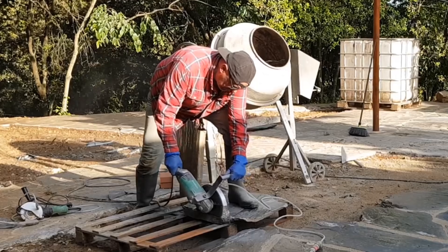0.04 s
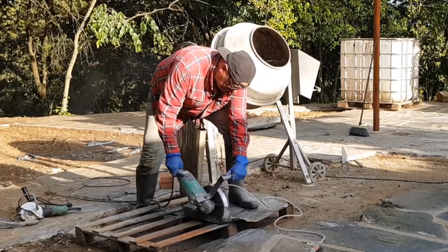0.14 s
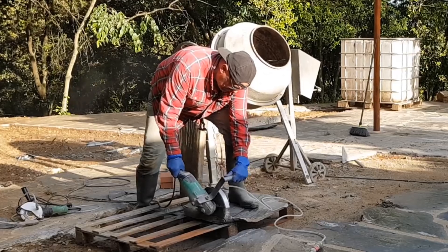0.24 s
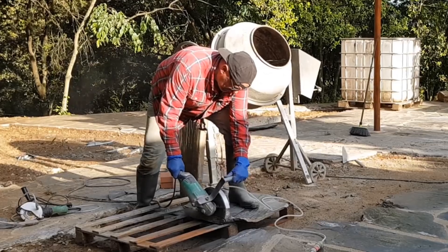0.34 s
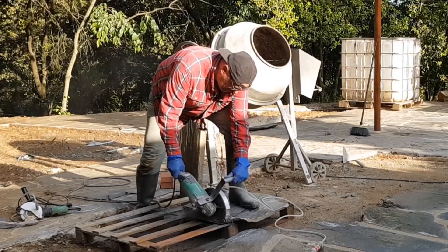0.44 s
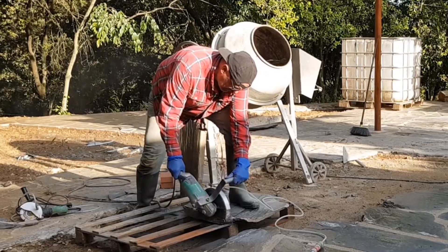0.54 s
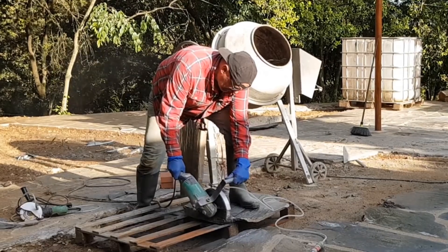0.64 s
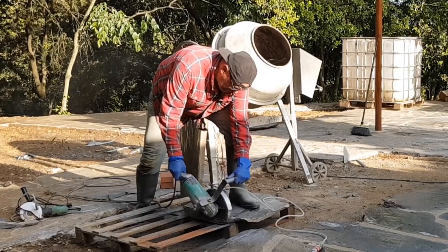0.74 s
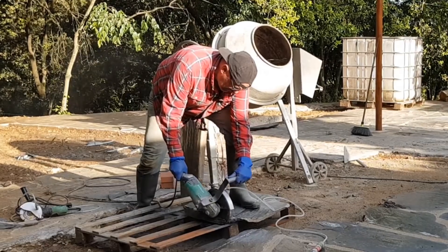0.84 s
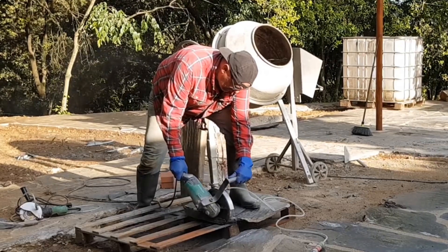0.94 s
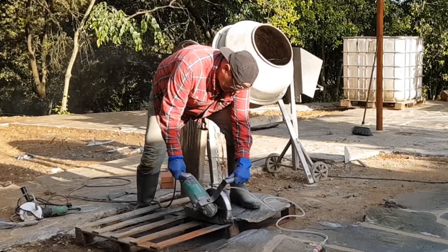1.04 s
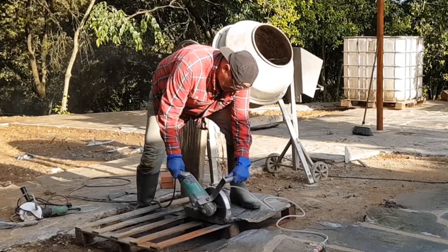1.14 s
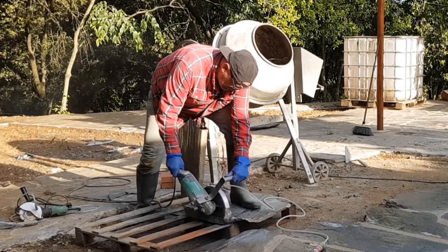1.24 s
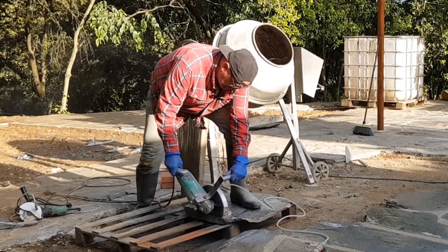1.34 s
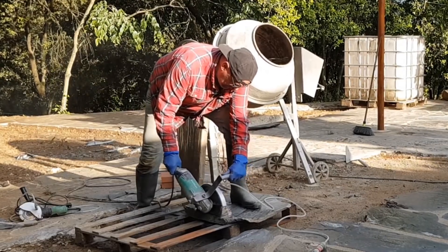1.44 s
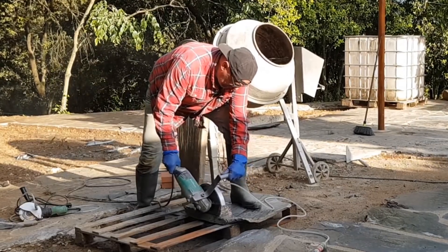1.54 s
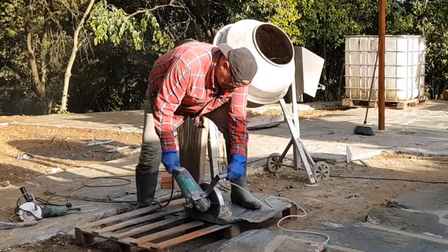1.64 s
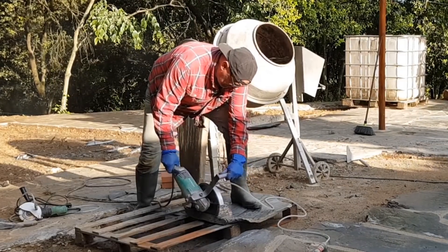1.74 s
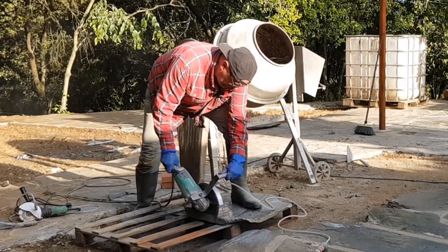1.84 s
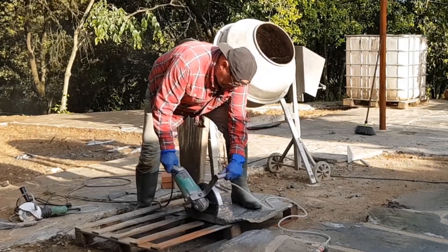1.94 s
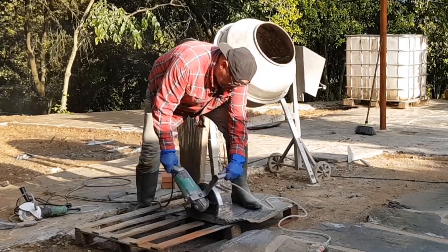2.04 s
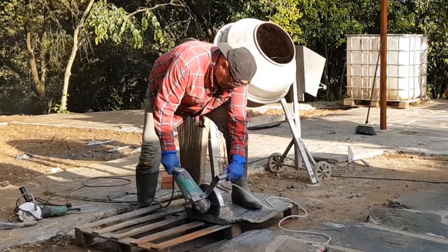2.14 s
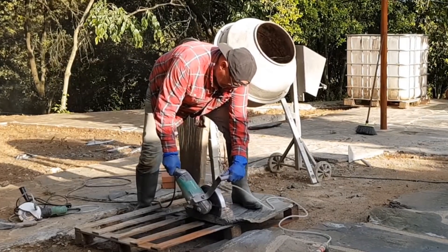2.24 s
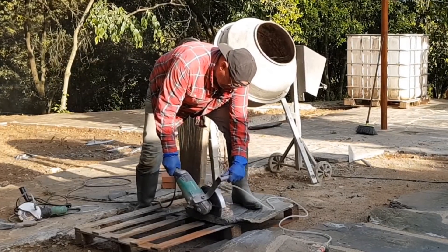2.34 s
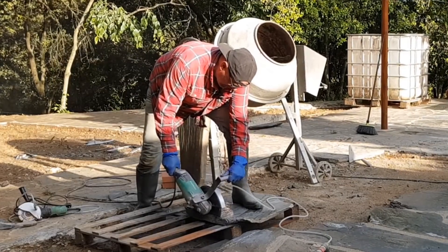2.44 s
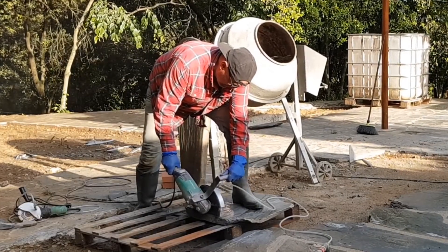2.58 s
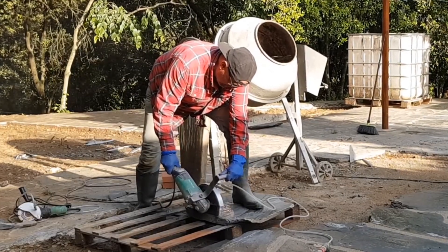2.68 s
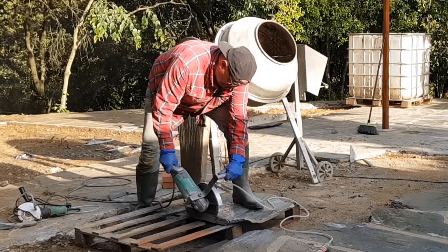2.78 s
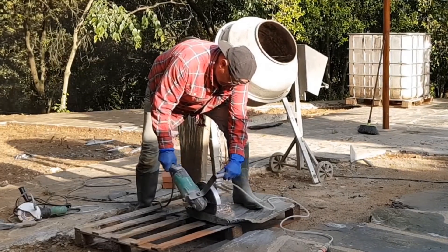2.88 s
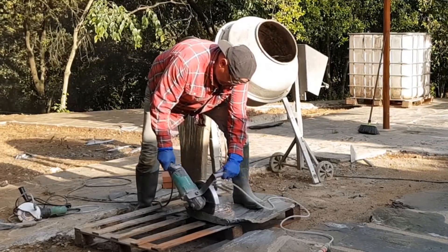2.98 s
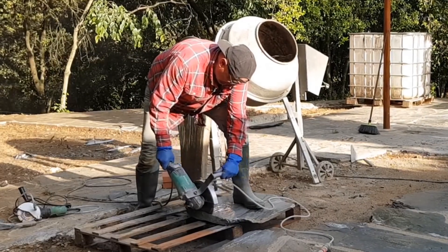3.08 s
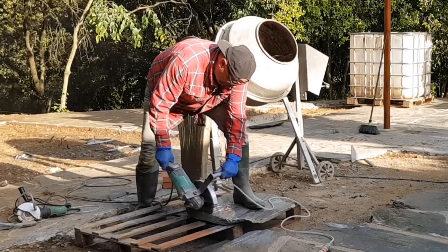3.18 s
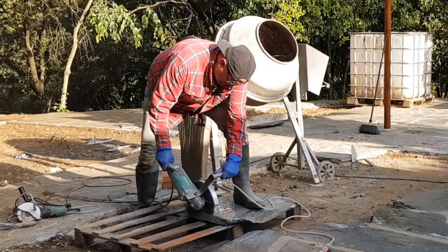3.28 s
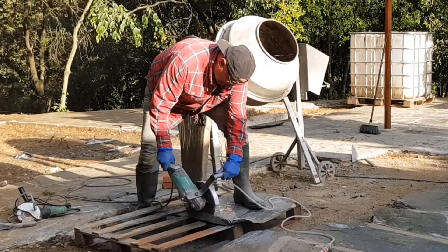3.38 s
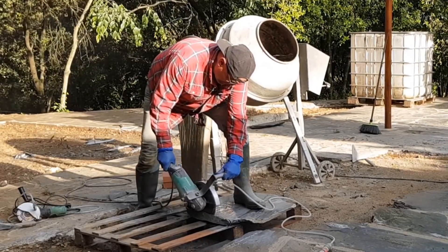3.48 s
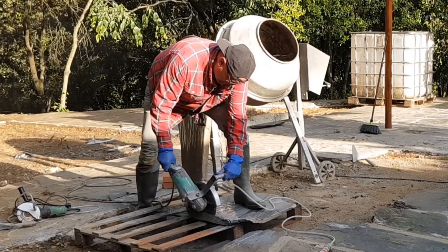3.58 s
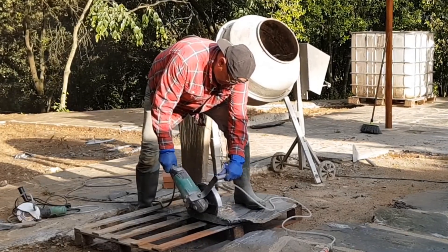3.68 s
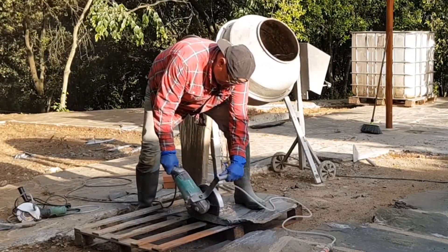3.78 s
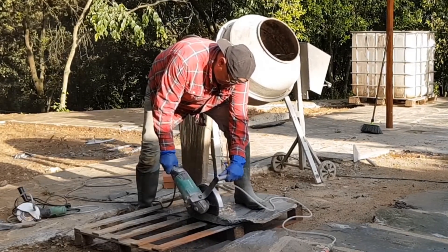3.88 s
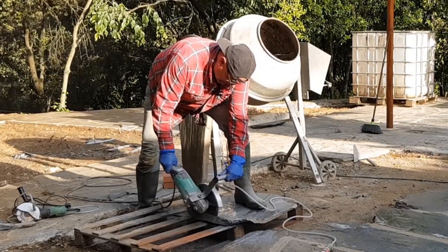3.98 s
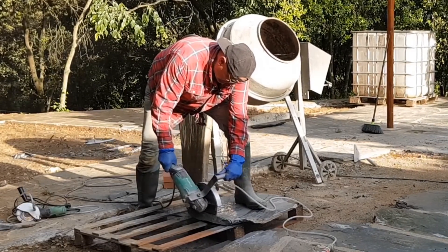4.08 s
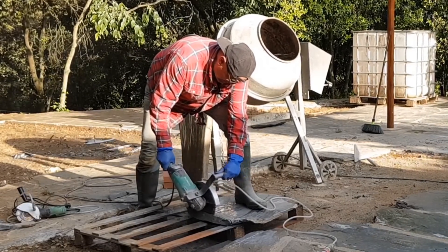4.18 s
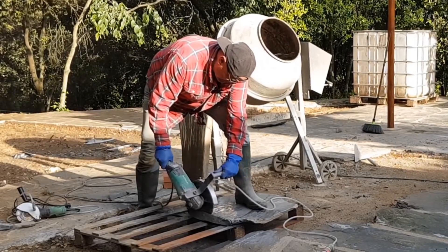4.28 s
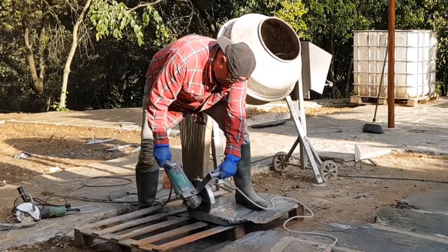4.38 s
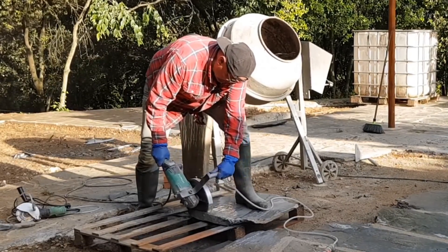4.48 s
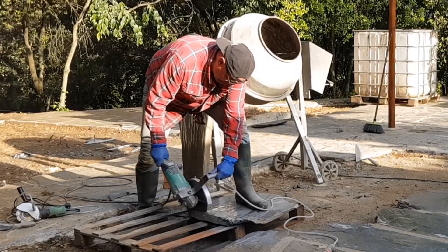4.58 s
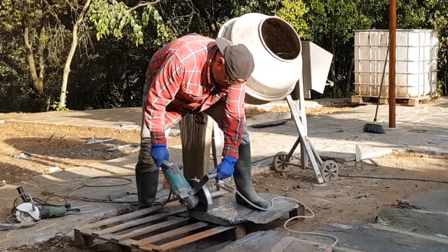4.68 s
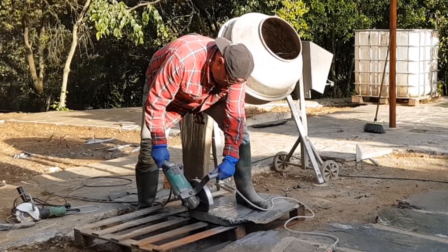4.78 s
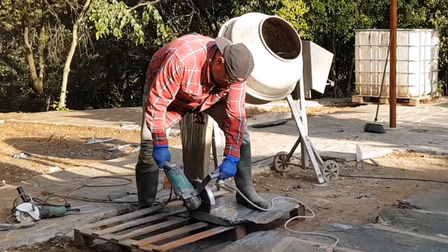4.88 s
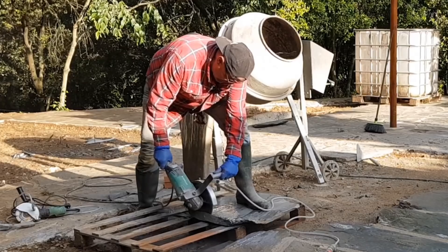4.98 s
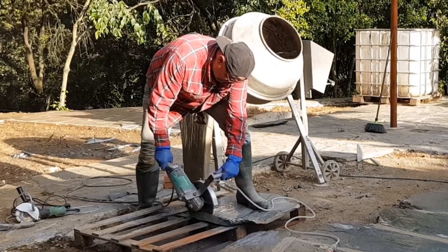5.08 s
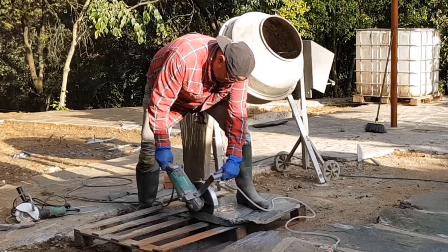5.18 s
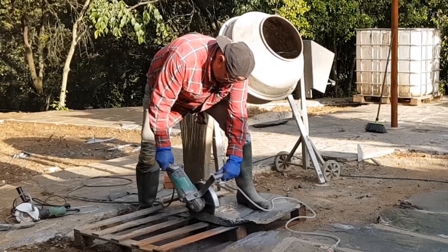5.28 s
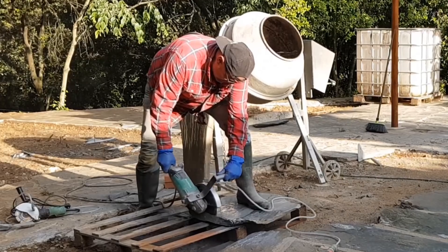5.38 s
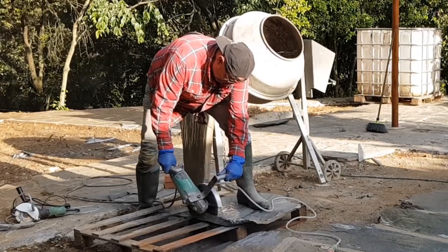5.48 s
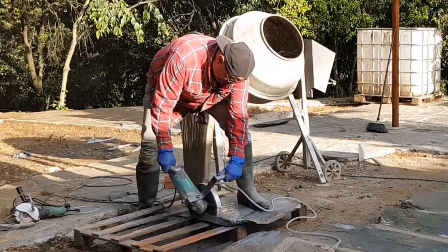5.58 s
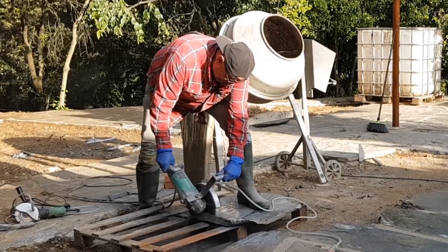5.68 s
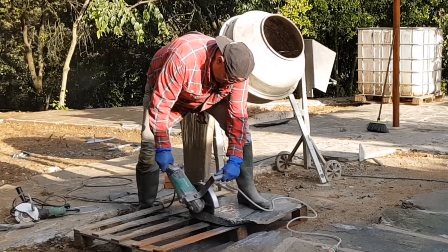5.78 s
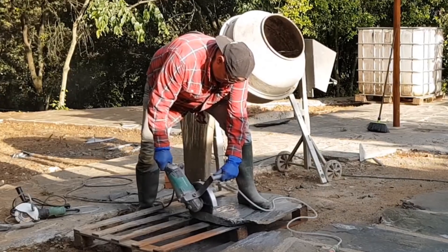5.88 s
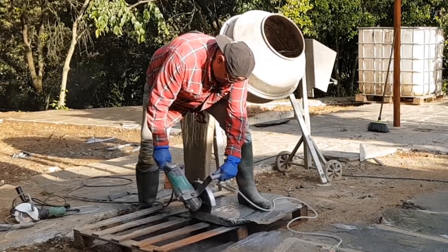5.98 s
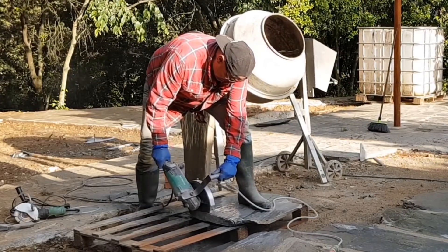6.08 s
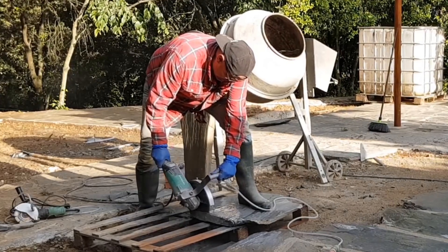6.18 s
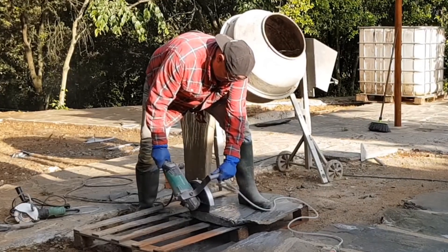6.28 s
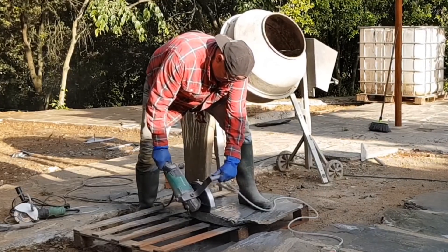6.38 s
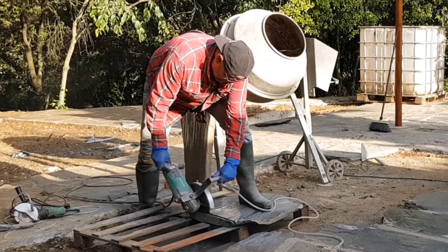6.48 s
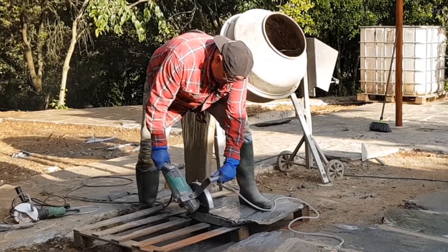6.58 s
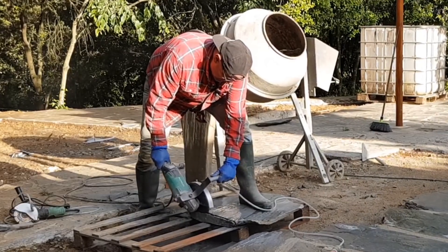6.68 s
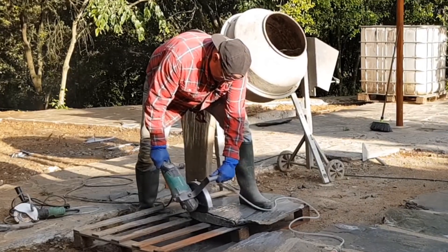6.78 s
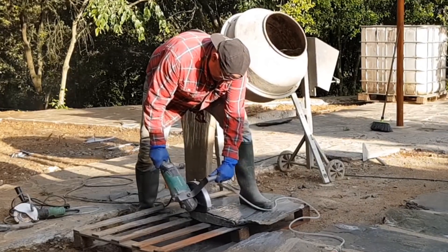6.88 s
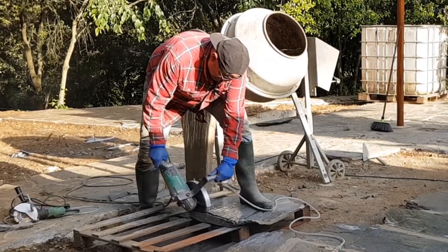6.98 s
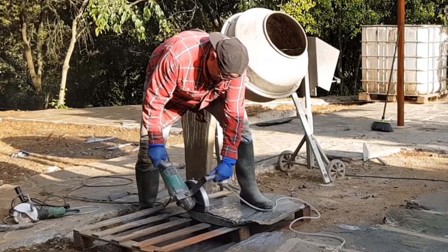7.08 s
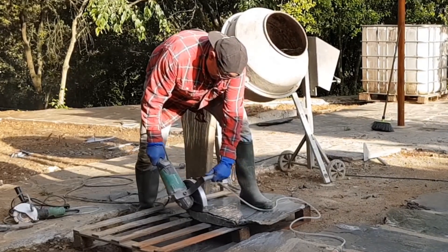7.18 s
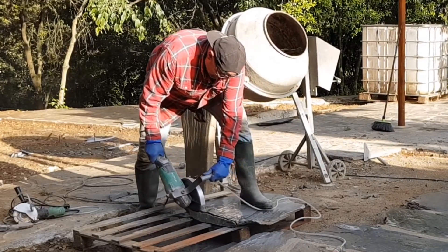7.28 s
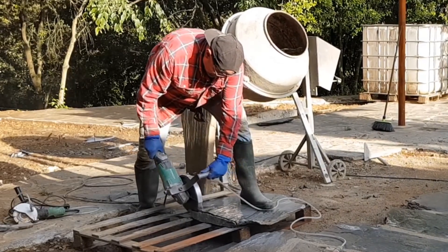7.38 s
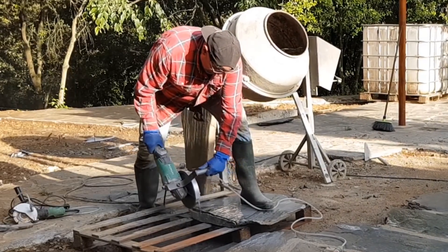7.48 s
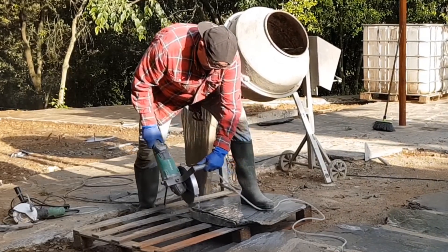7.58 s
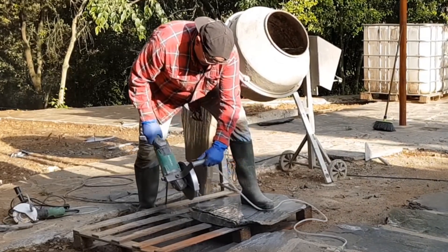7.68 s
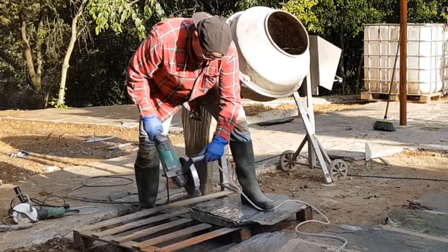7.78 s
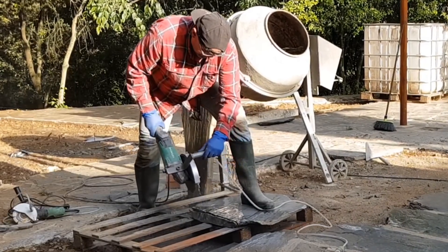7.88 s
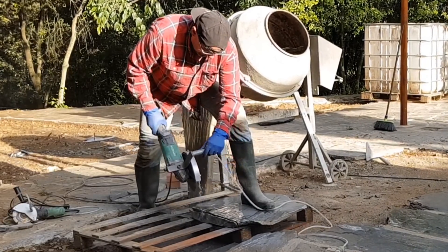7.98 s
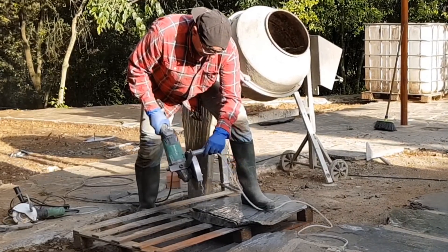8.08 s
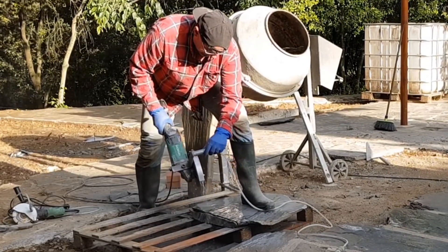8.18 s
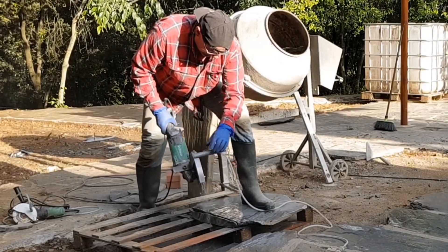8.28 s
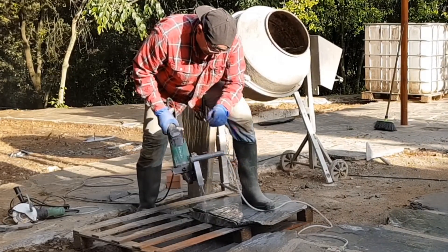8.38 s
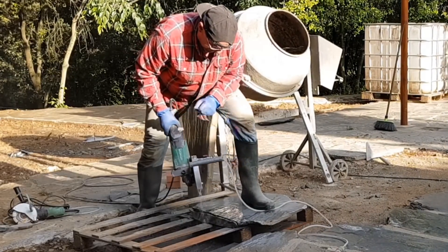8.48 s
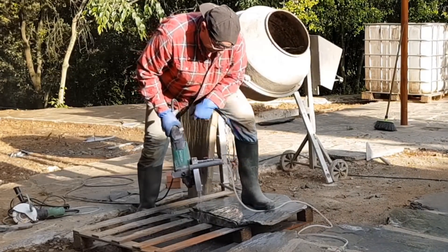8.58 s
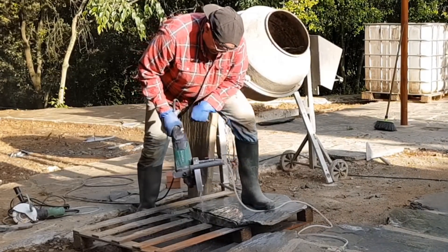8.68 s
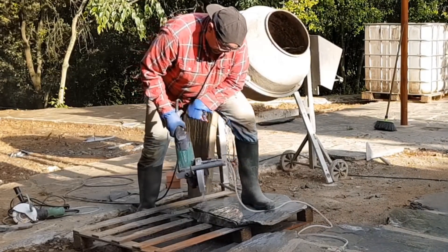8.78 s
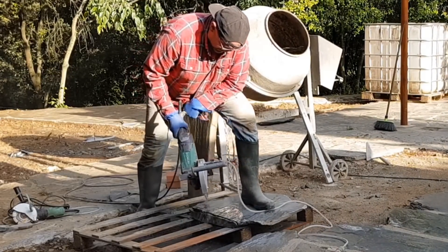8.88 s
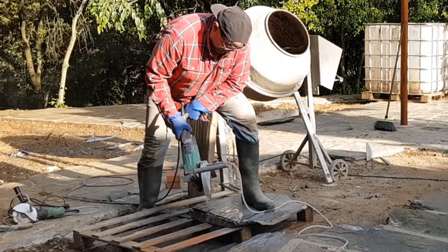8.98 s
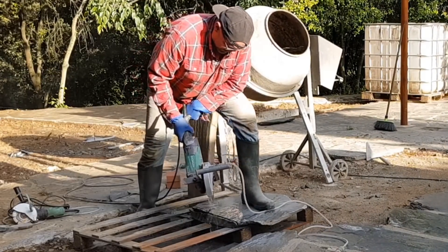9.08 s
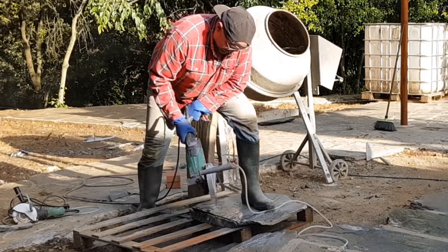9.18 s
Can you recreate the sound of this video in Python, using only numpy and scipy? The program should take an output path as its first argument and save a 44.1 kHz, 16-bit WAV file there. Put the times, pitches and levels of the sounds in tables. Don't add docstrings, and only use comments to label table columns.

```python
import sys
import numpy as np
from scipy import signal
from scipy.fft import rfft, irfft
from scipy.io import wavfile

SR = 44100
rng = np.random.default_rng(int(sys.argv[2]) if len(sys.argv) > 2 else 0)


def wrap_up_sound(samples):
    columns = np.atleast_2d(samples).T
    tamed = np.clip(columns, -1, 1)
    steps = np.round(tamed * 32767).astype(np.int16)
    wavfile.write(sys.argv[1], SR, steps)


def gain_from_db(level_db):
    decades = np.asarray(level_db, float) / 20
    return 10 ** decades


N = 407484

LIFT_S, SWITCH_OFF_S = 6.6, 7.44
RAISE_S, RAISE_TAKES_S = 7.66, 0.59
WHINE_PER_GEAR, GEAR_TEETH = 7.447, 12
# [t/s, f/Hz]
SPEED = [(0, 8380), (.7, 8250), (.95, 7700), (1.3, 8250), (2.2, 8700), (3.7, 8550), (5.0, 8700),
         (6.0, 8880), (6.55, 9120), (6.8, 9370), (7.05, 9520), (7.3, 9560), (7.44, 9760)]


def cutting(spin_hz):
    # [f/Hz, width/Hz, left port leads/rad, left over right/dB]
    disc = [(2720, 110, 0.3, 0), (3130, 55, 0.3, 0), (3500, 120, -2.5, 1), (3730, 90, 1.6, -3),
            (3910, 80, -2.6, -5), (4230, 55, 2.9, -3), (4360, 90, -2.8, -3), (4480, 60, -2.3, -2),
            (4530, 70, -1.5, -2), (4960, 90, 2.7, -4), (5310, 80, 2.4, -2), (5480, 60, -1.2, -1),
            (6040, 55, -1.1, -4), (6320, 150, -2.3, 0), (6610, 60, -1.2, -2), (7000, 55, -2.1, 0),
            (7320, 45, 1.0, 0), (7520, 55, 1.5, -1), (7740, 65, 0.3, -1), (8250, 50, -0.8, 1),
            (8710, 150, -1.5, -2), (9270, 70, 3.1, 1), (9450, 45, 0.9, 0), (10240, 250, 0.1, 1),
            (10730, 55, -0.2, 0), (11480, 50, -2.5, -1), (11700, 70, 3.1, 0), (12180, 60, 2.2, 2),
            (12410, 110, 1.4, 1), (14220, 150, 2.3, 1)]
    disc_db = [(-15), (-3), (-7), (-6), (-2), (-4), (-5), (0), (2), (-2), (-3), (-6), (-8), (-10), (-3),
               (-4), (-9), (-9), (-7), (-14), (-11), (-13), (-13), (-6), (-14), (-12), (-11), (-11), (-9),
               (-10)]
    # [f/Hz, level/dB]
    scratch_colour = [(2300, -32), (2900, -18), (3200, -3), (5400, -2), (5900, -7), (7700, -8), (8500, -14),
                      (10000, -6), (13300, -5), (14500, -10), (15500, -7)]
    # [f/Hz, level in a shallow cut/dB, change at full depth/dB,
    # share of the pressure swing, share of the tilt]
    zone_table = [(3100, -17, -2, 0.77, 1.0), (3740, -20, 0.5, 0.49, .2), (4440, -28.5, 8.5, 1.17, .1),
                  (4960, -19, -2.5, 0.98, -.1), (5400, -23.5, 4.5, 0.93, -0.15),
                  (6040, -18, -2, 0.91, 0.01), (6400, -19, -0.5, 1.17, -.3), (10000, -18, -2, 0.97, -.1)]
    mean_press_db, full_depth_s = -19, 2.93
    press, tilt = pressure()
    depth = ramp(0, full_depth_s)
    turn = np.sin(2 * np.pi * np.cumsum(spin_hz) / SR)
    bite = gain_from_db(0.52 * drift(39) + 0.89 * drift(18.7) + 0.83 * turn + 2.2 * rng.standard_normal(N))
    zones = [db + deep_db * depth + follows * (press - mean_press_db) + tilts * tilt
             for _, db, deep_db, follows, tilts in zone_table]
    zone_pitch = np.log([zone[0] for zone in zone_table])

    def level(hz):
        place = np.interp(np.log(hz), zone_pitch, np.arange(len(zones)))
        k = min(int(place), len(zones) - 2)
        return zones[k] + (place - k) * (zones[k + 1] - zones[k])

    scratch = rms_one(coloured(to_ports(shared(alike=0.087) * bite), scratch_colour))
    out = sum(gain_from_db(level(hz) - 1.5 + 0.8 * drift(7)) * band for hz, band in bands(scratch, 2100, count=6))
    drives = [shared(alike=0.9) * bite for _ in range(3)]
    for k, (shape, db) in enumerate(zip(disc, disc_db)):
        wander = (2.5 if k > 1 else 1.2) * drift(0.8) + drift(6)
        out += gain_from_db(level(shape[0]) + db - 5 + wander) * mode(drives[k % 3], *shape)
    return out


def pressure():
    # [t/s, pressure/dB, tilt that frees the lowest ring/dB]
    long_cut = [(0.0, -19, -4), (0.71, -18.5, 2), (0.99, -23, 3.5), (1.23, -21, 1), (1.29, -17, 3.5),
                (1.7, -20, -3), (3.94, -18, -0.5), (4.03, -24, 0), (4.07, -17, 1.5), (5.08, -18, -1.5),
                (5.24, -21, -3.5), (5.56, -19, 1), (5.62, -25.5, 4), (5.88, -17.5, 2), (6.34, -20, 3.5),
                (6.51, -21.5, 6), (6.64, -21, 3.5), (6.7, -25, 3.5)]
    # [t/s, hold/s, level/dB]
    touches = [
        (6.721, 0.692, -34),
        (6.842, 0.058, -30.5),
        (7.046, 0.094, -35),
        (7.476, 0.091, -27),
    ]
    attack_s, release_s = 0.0067, 0.03
    cut_db, tilt = in_time(long_cut)
    gain = gain_from_db(cut_db) * held(-1, 1 + long_cut[-1][0], 1, release_s) + 1e-6
    for s, hold_s, db in touches:
        gain = gain + gain_from_db(db) * held(s, hold_s, attack_s, release_s)
    return 20 * np.log10(gain), tilt


def motor():
    # [f/Hz, level/dB]
    air_colour = [(88, -42), (150, -24), (326, -15), (611, -19), (702, -22), (825, -17.5), (1600, -2.5),
                  (1900, -33.5), (2110, -5.5), (2400, -28), (3120, -28), (5280, -120)]
    # [f/Hz, width/Hz, left port leads/rad, left over right/dB]
    body = [(480, 25, -0.1, 1), (570, 35, -0.1, 1), (650, 60, 0.0, 0), (720, 40, 0.4, -4),
            (1000, 40, -0.8, 1), (1240, 130, 2.5, -1), (1600, 90, 1.9, 0), (1780, 90, 1.3, 0),
            (2100, 80, 1.2, 0), (2210, 60, 1.3, 2)]
    body_db = [(-32), (-25.5), (-22.5), (-26.5), (-22), (-9), (-21), (-14.5), (-17), (-19)]
    # [t/s, level/dB]
    slab_shake = [(0.0, -47), (1.26, -42), (1.34, -47), (2.34, -46), (2.37, -49), (5.58, -41),
                  (5.99, -45.5), (9.01, -43.5), (9.24, -51.5)]
    housing_db, raise_db = -37.5, 3
    slab_mean_db, slab_swing = -43.5, 1.4
    low_db = housing_db + raise_db * ramp(RAISE_S, RAISE_TAKES_S)
    slab_db = slab_swing * (in_time(slab_shake)[0] - slab_mean_db) - 6.5 + housing_db - low_db
    air = rms_one(coloured(to_ports(shared(alike=0.33)), air_colour))
    out = sum(gain_from_db(2.7 * drift(3.6) - 3) * band for hz, band in bands(air, 113.0, count=10))
    drives = [shared(alike=0.85) for _ in range(2)]
    lifted = ramp(LIFT_S - 0.3, 0.5)
    for k, (shape, db) in enumerate(zip(body, body_db)):
        hz = shape[0]
        lift_db = 6 if 700 < hz < 800 else -5 if hz < 1300 else 0
        slab = (slab_db + 12) * (hz < 800) + lifted * lift_db
        out += gain_from_db(db + 9 + slab + 2.5 * drift(1.6)) * mode(drives[k % 2], *shape)
    return gain_from_db(low_db) * out


def shaded(x):
    # [f/Hz, width/Hz, level/dB]
    nulls = [(2280, 71, 1), (2960, 88, 0), (5670, 84, 1), (6840, 110, -3), (8400, 98, -4), (12140, 130, -3),
             (13760, 170, -2), (14600, 150, -3), (14800, 180, 3)]
    for hz, width, db in nulls:
        x = x - (1 - gain_from_db(db)) * signal.lfilter(*signal.iirpeak(hz, hz / width, SR), x)
    return x


def fan():
    # [f/Hz, level/dB]
    fan_colour = [(1500, -20), (2300, -6), (3300, -5), (4300, -6), (5300, -9), (7000, -10), (11000, -13),
                  (15500, -16)]
    fan_db, raise_hiss_db = -33, 5
    throat_open_db, raise_throat_db, buried_db = 2.5, 4.5, -2
    raised = ramp(RAISE_S, RAISE_TAKES_S)
    level_db = fan_db + raise_hiss_db * raised
    throat_db = throat_open_db + (raise_throat_db - raise_hiss_db) * raised + buried_db * (1 - ramp(LIFT_S, 0.24))
    hiss = rms_one(coloured(shared(alike=0.07), fan_colour))
    parts = bands(hiss, 1593, count=7)
    return gain_from_db(level_db) * sum(gain_from_db(0.8 * drift(6) + throat_db * (hz < 4500)) * band for hz, band in parts)


def rotor(whine_hz):
    # [multiple of the mesh, level/dB]
    overtones = [(4, -3), (5, -1), (6, -12), (7, -9), (8, -10), (8.84, -7), (10, -9), (11, -9), (12, -9)]
    # [multiple of the mesh, level/dB]
    load_lines = [(.42, -13), (.495, -6), (.935, 0), (1.1, -6), (1.19, -5)]
    whine_db, mesh_db, overtones_db, load_lines_db = -36, -37, -39, -47
    loaded_mesh_db, mesh_db_per_khz, loaded_wobble = -8, 6.5, 0.009
    lifted, free = ramp(LIFT_S, 0.7), ramp(7.35, 0.2)
    gear_hz = whine_hz / WHINE_PER_GEAR * (1 + loaded_wobble * (1 - ramp(5.8, 0.8)) * drift(6.03))
    fading_db = mesh_db_per_khz * free * (whine_hz - SPEED[-1][1]) / 1000
    gear_db = mesh_db + fading_db + loaded_mesh_db * (1 - ramp(3.3, 2.8))
    out = gain_from_db(whine_db + vented(whine_hz) - 17 * (1 - lifted) + 1.1 * drift(31)) * tone(whine_hz, lead=0.86)
    out += gain_from_db(gear_db - 1.5 + (3.5 - 2.5 * ramp(5.5, 1)) * drift(3)) * tone(gear_hz, lead=1.8)
    for multiple, db in overtones:
        db = overtones_db + db + vented(multiple * gear_hz)
        out += gain_from_db(db - 20 * (1 - free) + 2.5 * drift(4)) * tone(multiple * gear_hz, lead=multiple)
    for multiple, db in load_lines:
        lead, gone = (2.3, free) if multiple > 0.8 else (0, ramp(5.8, 0.5))
        db = load_lines_db + db - 18 * gone + 4 * lifted
        out += gain_from_db(db + 3 * drift(2.5)) * tone(multiple * gear_hz, lead)
    return out


def speed():
    coast_hz_per_s = 1465
    return in_time(SPEED)[0] - coast_hz_per_s * np.maximum(np.arange(N) / SR - SWITCH_OFF_S, 0)


def vented(hz):
    # [from f/Hz, to f/Hz, level/dB]
    vents = [(5230, 5780, 4), (7000, 7560, 0), (7960, 8760, 0), (9260, 9900, -3), (10300, 15500, -4)]
    shut_db, edge_hz = -15, 90
    open_db = [shut_db + (db - shut_db) * np.clip(np.minimum(hz - low, high - hz) / edge_hz, 0, 1)
               for low, high, db in vents]
    return np.max(open_db, axis=0)


def singing(whine_hz):
    # [t/s, length/s, f/Hz, level/dB]
    hums = [
        (6.7, 0.55, 3095, -30),
        (6.7, .62, 4540, -34),
        (7.292, 0.15, 3265, -30),
        (7.492, 0.087, 3114, -27),
        (7.58, 0.25, 3096, -37.5),
        (7.765, 0.37, 3114, -31.5),
        (8.45, 0.57, 2563, -31.5),
        (8.58, 0.14, 2544, -25),
        (8.65, 0.21, 3176, -33),
        (8.95, .3, 3200, -34),
    ]
    out, coasting = 0, np.where(ramp(SWITCH_OFF_S, 1) > 0, whine_hz, SPEED[-1][1])
    for s, length_s, hz, db in hums:
        pitch = hz * np.sqrt(coasting / coasting[round(s * SR)]) * (1 + 0.004 * drift(20))
        lead = 0.6 if hz > 2800 else -0.4
        out = out + gain_from_db(db + 3.5 * drift(35)) * held(s, length_s, 0.05, 0.04) * tone(pitch, lead)
    return out


def gear_rattle():
    # [t/s, peak level/dB]
    tooth_knocks = [(7.4783, -31), (7.5107, -33), (7.5521, -32), (7.5985, -39), (7.6384, -28), (7.6858, -31),
                    (7.7327, -34), (7.7901, -29), (7.8275, -30), (7.8604, -30), (7.9068, -27), (7.9477, -22.5),
                    (7.9906, -33), (8.026, -29), (8.0545, -26), (8.0884, -29), (8.1238, -29), (8.1513, -23),
                    (8.1962, -28), (8.2211, -23), (8.2495, -29),
                    (8.3189, -26), (8.3488, -19), (8.3887, -18), (8.4366, -17), (8.477, -16), (8.5244, -19),
              (8.5947, -23), (8.6242, -16), (8.668, -21), (8.6987, -16), (8.7424, -22), (8.766, -19.5),
              (8.797, -21), (8.836, -21.5), (8.869, -18), (8.9124, -16.5), (8.9469, -17), (8.9873, -19),
              (9.0427, -17), (9.0807, -13.5), (9.1096, -15.5), (9.152, -17), (9.1924, -14.5), (9.224, -18)]
    # [f/Hz, from t/s, to t/s, level/dB]
    gearbox = [(4250, 7.4, 7.88, 4), (3950, 7.88, 8.32, 3), (3570, 8.32, 9.06, -2), (3130, 8.65, 9.3, 1)]
    backlash = [(s, db + mode_db, hz) for hz, start_s, end_s, mode_db in gearbox
                for s, db in tooth_knocks if start_s <= s < end_s]
    return gain_from_db(-4.5) * knocks(backlash, rise_s=0.005, fall_s=0.005, noisy=0.55)


def chip():
    # [t/s, peak level/dB, f/Hz]
    chips = [
        (5.5498, -20.5, 2230),
    ]
    return gain_from_db(-1.5) * knocks(chips, rise_s=0.0032, fall_s=0.012, noisy=0.086)


def knocks(events, rise_s, fall_s, noisy):
    out, t = np.zeros(N), np.arange(round(0.08 * SR)) / SR
    shape = (1 - np.exp(-t / rise_s)) ** 2 * np.exp(-t / fall_s)
    for (s, db, hz), noise in zip(events, rng.standard_normal((len(events), len(t)))):
        near = signal.butter(2, [0.93 * hz, 1.2 * hz], "band", fs=SR, output="sos")
        rough = rms_one(signal.sosfilt(near, noise))
        burst = gain_from_db(db) * shape / shape.max() * (np.sin(2 * np.pi * hz * t) + noisy * rough)
        at = round(s * SR)
        out[at:at + len(t)] += burst[:N - at]
    return out


def wind():
    # [t/s, peak level/dB]
    puffs = [
        (1.54, -40),
        (1.831, -31),
        (2.089, -48),
        (4.079, -60),
        (4.38, -41),
        (4.695, -60),
        (5.44, -42),
    ]
    t = np.arange(N) / SR
    gust = gain_from_db(-66 + 2.5 * drift(3) + 3.0 * drift(9))
    for s, db in puffs:
        gust = gust + gain_from_db(db - 12) * np.exp(-((t - s - 0.03) / 0.022) ** 2)
    lumps = shared(alike=0.65)
    low = coloured(lumps, [(20, -41), (60, -7.0), (130, -12), (250, -0.5), (400, -25), (900, -80)])
    return gust * rms_one(low)


def to_ports(pair):
    # [left/ms, right/ms]
    path_ms = [(.39, 0), (2.72, 2.33)]
    # [left/dB, right/dB]
    path_db = [(-1, 0.1), (-10, -5)]
    ground_cut_hz = 4000
    dull = signal.sosfilt(signal.butter(1, ground_cut_hz, fs=SR, output="sos"), pair)
    n, out = np.arange(N), np.zeros((2, N))
    for sound, lag_ms, db in zip((pair, dull), path_ms, path_db):
        for side in (0, 1):
            lag = np.round(lag_ms[side] * SR / 1000)
            out[side] += gain_from_db(db[side]) * np.interp(n - lag, n, sound[side])
    return out


def mode(drive, hz, width, lead, pan_db):
    r, w = np.exp(-1.55 * np.pi * width / SR), 2 * np.pi * hz / SR
    poles = [1, -2 * r * np.cos(w), r * r]
    ports = []
    for side, x in zip((1, -1), drive):
        turn = side * lead / 2
        ring = signal.lfilter([np.cos(turn), -r * np.cos(w - turn)], poles, x)
        ports.append(gain_from_db(side * pan_db / 2) * ring)
    return rms_one(signal.lfilter([1, 0, -1], poles, ports))


def tone(hz, lead):
    phase = 2 * np.pi * (np.cumsum(hz) / SR + rng.random())
    return np.sqrt(2) * np.sin([phase + lead / 2, phase - lead / 2])


def shared(alike):
    common, left, right = rng.standard_normal((3, N))
    alike = np.clip(alike, 0, 1)
    return np.sqrt(alike) * common + np.sqrt(1 - alike) * np.array([left, right])


def coloured(x, spectrum):
    hz, db = np.transpose(spectrum)
    grid = np.fft.rfftfreq(N, 1 / SR) + 1
    return irfft(rfft(x) * gain_from_db(np.interp(np.log(grid), np.log(hz), db)), N)


def bands(x, low_hz, count):
    edges = np.minimum(low_hz * 2 ** (np.arange(count + 1) / 2), 0.45 * SR)
    for k, (low, high) in enumerate(zip(edges, edges[1:])):
        band = signal.sosfilt(signal.butter(2, [low, high], "band", fs=SR, output="sos"), x)
        yield np.sqrt(low * high), (-1) ** k * band


def drift(rate):
    r = np.exp(-80 * np.pi * rate / SR)
    slow = signal.lfilter([1], [1, -2 * r, r * r], rng.standard_normal(N // 40 + 2002))[2000:]
    return np.interp(np.arange(N) / 40, np.arange(len(slow)), rms_one(slow))


def in_time(rows):
    s, *columns = np.transpose(rows)
    return [np.interp(np.arange(N) / SR, s, c) for c in columns]


def ramp(start_s, takes_s):
    return np.clip((np.arange(N) / SR - start_s) / takes_s, 0, 1)


def held(s, hold_s, attack_s, release_s):
    return ramp(s, attack_s) * np.exp(-np.maximum(np.arange(N) / SR - s - hold_s, 0) / release_s)


def rms_one(x):
    return x / np.sqrt(np.mean(x ** 2) + 1e-20)


def scene():
    whine_hz = speed()
    spin_hz = whine_hz / WHINE_PER_GEAR / GEAR_TEETH
    tool = shaded(cutting(spin_hz) + motor()) + fan() + rotor(whine_hz) + singing(whine_hz)
    taps = gear_rattle() + chip()
    taps = np.array([taps, gain_from_db(2.5) * np.roll(taps, 2)])
    return tool + taps + wind()


def top_cut(x):
    return signal.sosfilt(signal.butter(12, 16470, fs=SR, output="sos"), x)


def record(dry):
    low_pass = signal.ellip(12, 0.5, 60, 15720, fs=SR, output="sos")
    mix = np.clip(signal.sosfilt(low_pass, dry), -1, 1)
    return top_cut(mix)


dry = scene()
out = record(dry)
wrap_up_sound(out)
```